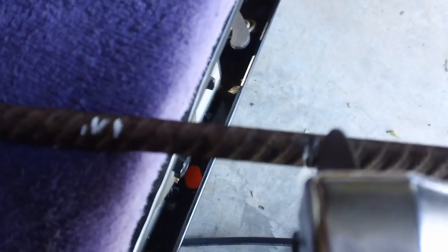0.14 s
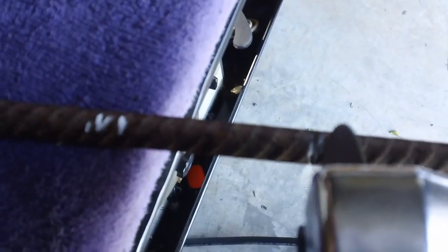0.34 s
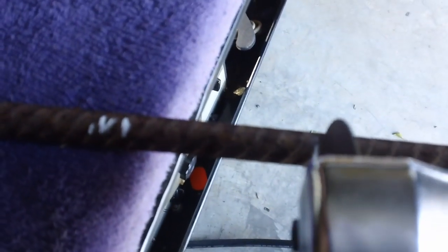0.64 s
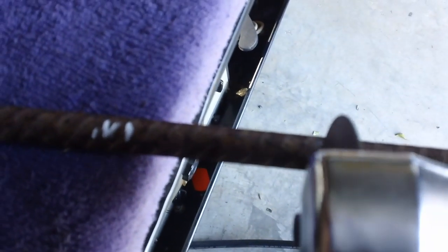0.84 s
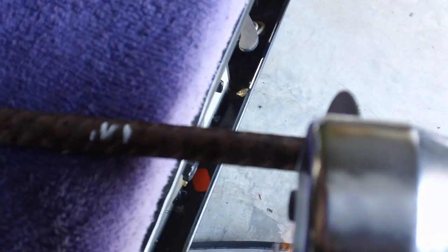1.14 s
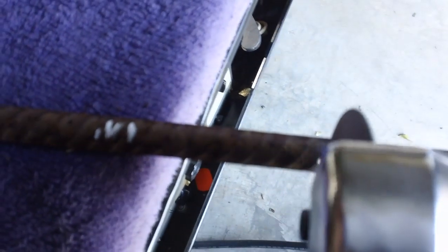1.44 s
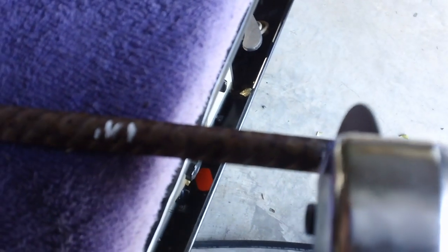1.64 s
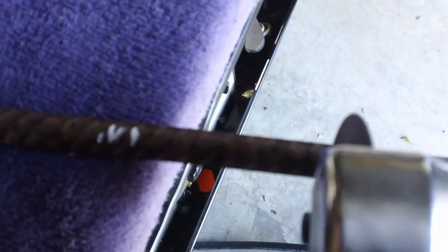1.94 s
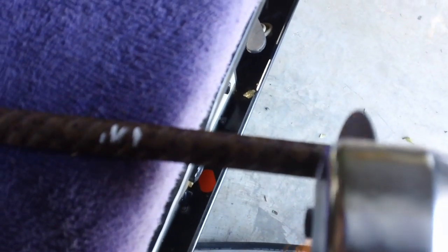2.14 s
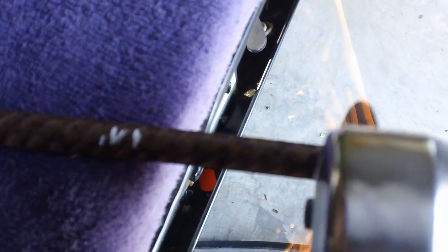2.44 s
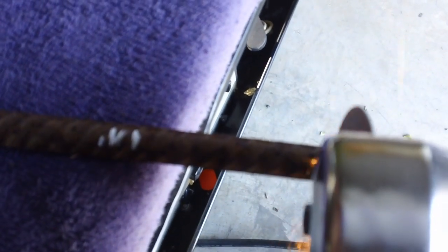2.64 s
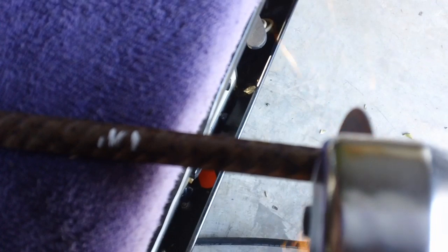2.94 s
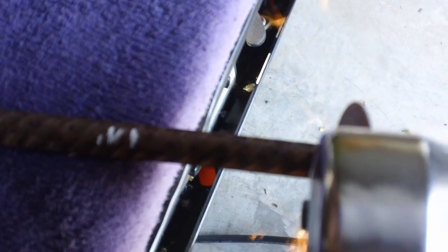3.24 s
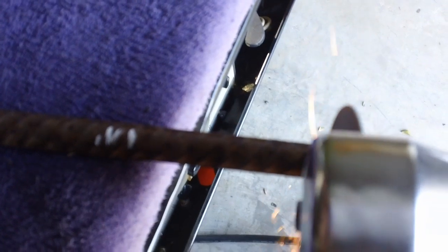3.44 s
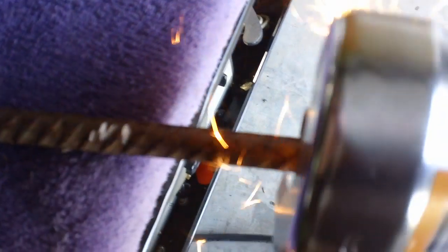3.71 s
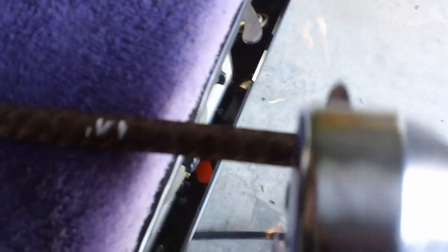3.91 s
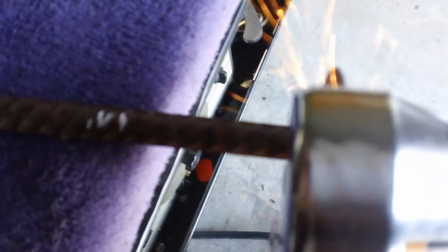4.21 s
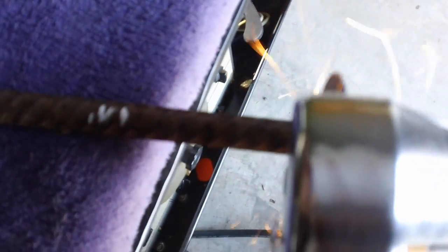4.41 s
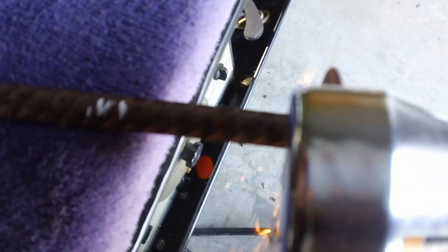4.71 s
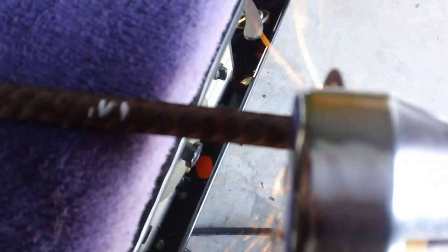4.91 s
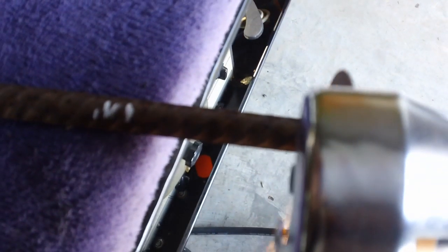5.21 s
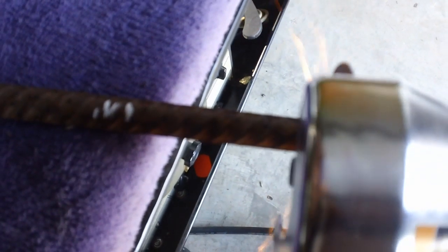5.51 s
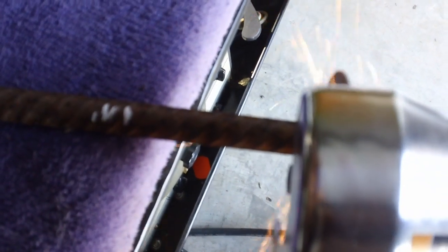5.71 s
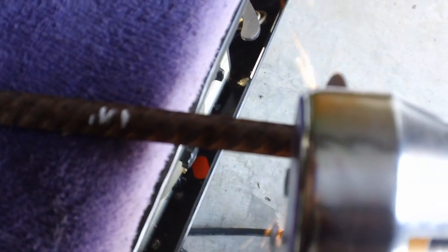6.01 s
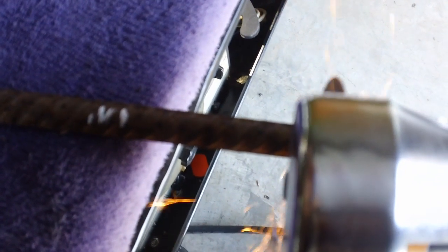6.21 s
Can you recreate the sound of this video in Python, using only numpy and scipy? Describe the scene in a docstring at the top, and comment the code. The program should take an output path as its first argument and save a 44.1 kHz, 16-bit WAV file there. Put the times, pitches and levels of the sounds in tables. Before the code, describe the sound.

An air-powered cut-off tool whines and hisses, then grinds into a steel rod, its pitch sagging under the load.

```python
"""At a workbench, an air-powered cut-off tool runs free, grazes a steel rod, then cuts into it and nearly
stalls once. The motor's four vanes puff air out of the exhaust, which makes a whine and a hiss.
The wheel's gritty rim scrapes the rod, hardest once a turn, and makes both wheel and steel ring.
One close microphone turns itself down when the sound is loud, so the hiss drops during the cut."""
import sys
import numpy as np
from scipy import signal
from scipy.fft import rfft, irfft
from scipy.io import wavfile
from scipy.ndimage import uniform_filter1d, map_coordinates

SR = 44100
rng = np.random.default_rng(int(sys.argv[2]) if len(sys.argv) > 2 else 0)


def generate_wav(signal):
    """Clip the signal to [-1, 1] and save it as 16-bit WAV at the path in sys.argv[1]."""
    frames = np.transpose(np.atleast_2d(signal))
    scaled = np.clip(frames, -1, 1) * 32767
    pcm = np.round(scaled).astype(np.int16)
    wavfile.write(sys.argv[1], SR, pcm)


N = 280228
TIME_S, SPECTRUM_HZ = np.arange(N) / SR, np.fft.rfftfreq(N, 1 / SR)
VANES = 4  # puffs of air per turn of the shaft


def gain_of(db):
    """Turn decibels into a number to multiply by."""
    return 10 ** (np.asarray(db) / 20)


def normalise(x):
    """Scale to an average strength (rms) of 1."""
    return x / np.sqrt(np.mean(x ** 2))


def even_out(x, window_s=.05):
    """Hold the strength near 1 from moment to moment."""
    return x / np.sqrt(uniform_filter1d(x ** 2, int(window_s * SR)) + 1e-12)


def follow(points):
    """Join (time_s, value) points with straight lines."""
    return np.interp(TIME_S, *np.transpose(points))


def drift(rate_hz):
    """A smooth random wander, about 1 in size."""
    hold = max(int(SR / rate_hz), 2)
    steps = np.repeat(rng.standard_normal(N // hold + 1), hold)
    return normalise(uniform_filter1d(uniform_filter1d(steps, hold), hold)[:N])


def tone_gain(hz, tone):
    """Read the gain at these pitches from (pitch_hz, level_db) points."""
    pitch_hz, level_db = np.transpose(tone)
    return gain_of(np.interp(np.log(hz + 1), np.log(pitch_hz), level_db))


def shape_tone(x, tone):
    """Give a sound this balance of low and high, at strength 1."""
    return normalise(irfft(rfft(x) * tone_gain(SPECTRUM_HZ, tone), N))


def peak(hz, pitch_hz, width_hz):
    """Gain of one resonance, a pitch at which a thing likes to ring: 1 at its centre."""
    return 1 / (1 + (2 * (hz - pitch_hz) / width_hz) ** 2)


def resonance_gain(hz, resonances):
    """Joint gain of several resonances at these pitches."""
    return np.sqrt(sum((gain_of(db) * peak(hz, pitch, width)) ** 2 for pitch, width, db in resonances))


def resonate(x, resonances):
    """Let a sound ring through resonances, at strength 1."""
    return normalise(irfft(rfft(x) * resonance_gain(SPECTRUM_HZ, resonances), N))


# Motor speed as the hand leans on the tool, before the dips: time_s, puff_rate_hz
MOTOR_SPEED = [(0.0, 931.7), (0.488, 928), (0.613, 916.5), (0.98, 918.7), (2.258, 911.1), (2.608, 825.5),
               (3.373, 757), (3.603, 749.9), (3.749, 712), (3.98, 787.5), (4.312, 766), (4.891, 723.3),
               (4.955, 739), (5.076, 732), (5.314, 760.9), (5.493, 744), (5.719, 696.6), (6.177, 683.4),
               (6.35, 661.6)]
# The wheel catches and drags the motor down: slowest_at_s, drop_hz, fall_s, recovery_s
SPEED_DIPS = [(1.231, 39.5, 0.17, 0.24), (3.824, 156, 0.08, 0.181), (4.173, 24, 0.055, 0.1),
              (4.545, 13.8, 0.052, 0.063)]

def motor_speed(dip_shape=1.7):
    """Puffs per second: the motor slows under load, drops fast at a catch and recovers more slowly."""
    puff_hz = follow(MOTOR_SPEED)
    for slowest_at_s, drop_hz, fall_s, recovery_s in SPEED_DIPS:
        slope_s = np.where(TIME_S < slowest_at_s, fall_s, recovery_s)
        away = np.minimum(np.abs(TIME_S - slowest_at_s) / slope_s, 1)
        puff_hz -= drop_hz * (1 - away ** dip_shape)  # shape 1 is pointed, 2 is round
    return puff_hz


def wheel_hum(turns, shaft_hz, octave_db=-9, waver_db=2.5):
    """The unbalanced wheel hums, loudest when it spins near the resonance of the tool's body."""
    hum = np.sin(2 * np.pi * turns) + gain_of(octave_db) * np.sin(2 * np.pi * 2 * turns)
    gain = gain_of(-53) + gain_of(-42.5) * peak(shaft_hz, pitch_hz=178.5, width_hz=27)
    return np.sqrt(2) * gain * gain_of(waver_db * drift(11)) * hum


# Whistles of the motor and wheel: start_s, end_s, cycles_per_turn, level_db
WHISTLE_NOTES = [(-.05, .65, 24, -34.5), (1.03, 1.3, 1, -44.5), (2.3, 2.9, 2, -47), (2.44, 2.68, 20, -28.5),
                 (3.28, 3.68, 32, -25.5), (3.3, 3.66, 30, -30), (3.34, 3.65, 47, -24),
                 (4.2, 4.8, 21, -31.5), (4.6, 5.2, 28, -31.5), (5.04, 5.55, 32, -31),
                 (5.08, 5.55, 21, -29.5), (5.56, 6.3, 28, -27.5), (5.6, 6.35, 9, -33.5),
                 (5.72, 6.2, 51, -26), (5.76, 6.14, 19, -28), (5.8, 6.35, 23, -30)]

def whistles(turns, fade_s=0.06, flutter_db=2.5):
    """Single tones sing out for a moment, and their pitch follows the shaft's speed."""
    out = 0
    for start_s, end_s, cycles_per_turn, level_db in WHISTLE_NOTES:
        fade = np.clip(np.minimum(TIME_S - start_s, end_s - TIME_S) / fade_s, 0, 1)
        gain = fade * gain_of(level_db + flutter_db * drift(25))
        out += gain * np.sin(2 * np.pi * cycles_per_turn * turns + drift(6))
    return np.sqrt(2) * out


# Tone of the vanes' buzz: pitch_hz, relative_level_db
BUZZ_TONE = [(170, -18), (370, -7), (460, -14.5), (650, -15), (1200, -8.5), (1600, 2.5), (2100, -11),
             (2600, -1), (3250, 6), (4200, 1.5), (5400, 2), (6500, 1), (8500, -8), (11000, -2)]

def vane_buzz(turns, shaft_hz, sway_db=3.6, flutter_db=3.0):
    """No two vanes seal alike, so weak tones sound at multiples of the shaft's speed."""
    out, hold = 0, 64  # each gain is held for 64 samples
    for multiple in range(2, 48):
        if multiple % VANES or multiple > 4 * VANES:  # skip the whine's four tones
            waver_db = sway_db * drift(1.98)[::hold] + flutter_db * drift(25.06)[::hold]
            gain = tone_gain(multiple * shaft_hz[::hold], BUZZ_TONE) * gain_of(waver_db)
            out += np.repeat(gain, hold)[:N] * np.sin(2 * np.pi * (multiple * turns + rng.random()))
    return normalise(out)


# Tone of the rushing air: pitch_hz, relative_level_db
HISS_TONE = [(30, -62), (100, -26), (200, -16.5), (700, -11.5), (1100, -8), (1600, -1.5), (2050, -7),
             (2800, 3), (3900, -0.5), (5100, 4.5), (6500, 0.5), (7500, 6), (9600, 4), (11500, -5.5),
             (13500, -5.5), (14900, 0)]

def air_hiss(turns, puff_depth=0.11, flicker_db=-0.02):
    """Swirling exhaust air hisses, pulsing a little with every vane."""
    puffs = 1 + puff_depth * np.cos(2 * np.pi * VANES * turns)
    return shape_tone(rng.standard_normal(N) * puffs, HISS_TONE) * gain_of(flicker_db * drift(15))


# Resonances of the exhaust that the whine slides through: pitch_hz, width_hz, level_db
EXHAUST_RESONANCES = [(667, 173, -22), (754.7, 74, -24.5), (812, 56.5, -23.5), (931.2, 8.3, -31),
                      (1206, 84, -25.5), (1353, 105, -28), (1502, 77, -25.5), (1707, 410, -28),
                      (2216, 220, -28.5), (2798, 370, -21), (3050, 460, -21.5), (3298, 36, -19),
                      (3610, 500, -27)]

def exhaust_whine(turns, puff_hz, load, flutter_db=0.75, sway_db=2.0, choke_db=-1.3):
    """The vanes' puffs blend into four clean tones that weaken and sway under load."""
    out = 0
    for harmonic in range(1, 5):
        waver_db = flutter_db * drift(35) + load * (choke_db + sway_db * drift(11))
        gain = resonance_gain(harmonic * puff_hz, EXHAUST_RESONANCES) * gain_of(waver_db)
        out += gain * np.sin(2 * np.pi * (harmonic * VANES * turns + rng.random()))
    return np.sqrt(2) * out


def grit_force(turns, load, high_spot=0.27, patchy_db=4.5, rim_points=256, fresh_free=0.02, fresh_stall=.7):
    """The grit pushes on the steel: the same grains come back every turn and slowly wear away."""
    grid = (int(turns[-1]) + 2, rim_points // 2 + 1)  # a row per turn, a column per ripple round the rim
    wear = .12 * np.cumsum(rng.standard_normal(grid), axis=0)
    patches = normalise(uniform_filter1d(rng.standard_normal(grid), size=40, axis=0, mode="wrap"))
    phase = wear + 2 * np.pi * rng.random(grid[1])
    bumps = irfft(gain_of(patchy_db * patches) * np.exp(1j * phase), rim_points)
    repeating = normalise(map_coordinates(bumps.ravel(), [turns * rim_points], order=3))
    # near a stall the rim bites unevenly, so a larger share is fresh on each turn
    fresh = fresh_free + (fresh_stall - fresh_free) * load ** 3
    force = np.sqrt(1 - fresh) * repeating + np.sqrt(fresh) * rng.standard_normal(N)
    # the wheel is not quite round and presses hardest once a turn
    return normalise(force * np.exp(high_spot * np.cos(2 * np.pi * turns)))


# Short bursts of ringing: peak_s, half_length_s, pitch_hz, width_hz, level_db
CHATTER_BURSTS = [(1.16, 0.16, 9060, 550, -24), (2.262, 0.029, 8100, 700, -19),
                  (3.808, 0.056, 3870, 380, -20.5), (3.813, 0.074, 5650, 500, -21.5),
                  (3.733, 0.031, 8180, 700, -15), (3.836, 0.094, 7800, 400, -23),
                  (3.818, 0.063, 9760, 398.7, -20), (3.885, 0.037, 3120, 380, -22),
                  (4.13, 0.036, 5895, 463.6, -16.5), (5.644, 0.046, 7120, 149.4, -24)]

def wheel_chatter(force):
    """When the wheel jams in its slot, single resonances swell and fade."""
    out = 0
    for peak_s, half_length_s, pitch_hz, width_hz, level_db in CHATTER_BURSTS:
        swell = np.exp(-((TIME_S - peak_s) / half_length_s) ** 2)
        ringing = resonate(force, [(pitch_hz, width_hz, 0)])
        strength = np.sqrt(np.average(ringing ** 2, weights=swell ** 2))
        out += gain_of(level_db) * swell * ringing / strength
    return out


# The wheel on the rod, one graze and two cuts: start_s, end_s, relative_level_db
TOUCHES = [(1.022, 1.27, -10), (2.232, 3.99, -1.5), (4.004, 6.45, -1.5)]

def wheel_touch(bite_s=0.022, lift_s=0.059):
    """How firmly the wheel meets the rod: a quick bite, a hold and a slower lift."""
    return sum(gain_of(db) * np.clip(np.minimum((TIME_S - start) / bite_s, (end - TIME_S) / lift_s), 0, 1)
               for start, end, db in TOUCHES)


# How hard the wheel is pushed into the steel: time_s, relative_level_db
HAND_PUSH = [(2.25, -17), (2.31, -18.5), (2.52, -12.5), (2.88, -10), (3.25, -15.5), (3.48, -14.5),
             (3.6, -15.5), (3.72, -10.5), (3.9, -9.5), (4.1, -15), (4.3, -13.5), (4.68, -16), (4.82, -15),
             (4.95, -18.5), (5.1, -14), (5.3, -19), (5.8, -14.5), (6.0, -18.5), (6.3, -13)]
# Tone of the tearing steel: pitch_hz, relative_level_db
RASP_TONE = [(30, -44), (100, -17.5), (200, -7.5), (400, -1.5), (1000, -1), (2000, -4.5), (3000, 3),
             (6000, -16.5), (12000, 0.5), (15000, -9.5)]
# Resonances of the wheel and rod: pitch_hz, width_hz, relative_level_db
STEEL_RESONANCES = [(3325, 170, -11.5), (3962, 530, -5.5), (4790, 160, -13), (5540, 190, -13.5),
                    (6200, 530, -7), (7204, 240, -2.5), (7420, 90, 1.5), (8030, 270, 1.5), (8310, 660, -1),
                    (8850, 290, 3.5), (10397, 500, -6), (11140, 970, -7), (14000, 670, -14.5)]

def steel_scrape(force, ring_db=1.6, rasp_db=-10.0, judder_db=1.1):
    """The grit rings wheel and rod over a rasp of tearing steel; a harder push is louder."""
    push_db = follow(HAND_PUSH) + judder_db * drift(26)  # the hand-held wheel shakes in its slot
    rasp = gain_of(rasp_db) * shape_tone(rng.standard_normal(N), RASP_TONE)
    ringing = gain_of(ring_db) * even_out(resonate(force, STEEL_RESONANCES))
    return wheel_touch() * gain_of(push_db) * (ringing + rasp)


def scene(air_db=-15.5, buzz_vs_hiss_db=-9.0, free_hz=930, stall_hz=560):
    """One shaft drives everything, and its speed trembles slightly."""
    puff_hz = motor_speed() * (1 + .0008 * drift(45))
    load = np.clip((free_hz - puff_hz) / (free_hz - stall_hz), 0, 1)  # 0 running free, 1 nearly stalled
    shaft_hz = puff_hz / VANES
    turns = np.cumsum(shaft_hz) / SR
    air = gain_of(air_db) * (air_hiss(turns) + gain_of(buzz_vs_hiss_db) * vane_buzz(turns, shaft_hz))
    tool = exhaust_whine(turns, puff_hz, load) + air + wheel_hum(turns, shaft_hz) + whistles(turns)
    force = grit_force(turns, load)
    mono = tool + steel_scrape(force) + wheel_chatter(force)
    return np.array([mono, mono])


def gain_control(x, threshold_db=-14.0, ratio=3.7, response_s=0.048):
    """Turn the sound down while its level is over the threshold."""
    memory = np.exp(-1 / (response_s * SR))
    level = np.sqrt(signal.lfilter([1 - memory], [1, -memory], np.mean(x ** 2, axis=0)))
    return x * np.maximum(level / gain_of(threshold_db), 1) ** (1 / ratio - 1)


def record(dry, ceiling=.85, low_cut_hz=70, notch_hz=12480, notch_width_hz=2400, top_hz=15330):
    """The microphone tames loud parts and drops the deep bass, one band of treble and the very top."""
    held = gain_control(dry)
    rounded = held / (1 + (held / ceiling) ** 8) ** (1 / 8)  # rounds off the tallest peaks
    thinned = signal.sosfilt(signal.butter(2, low_cut_hz, "high", fs=SR, output="sos"), rounded)
    notched = signal.lfilter(*signal.iirnotch(notch_hz, notch_hz / notch_width_hz, fs=SR), thinned)
    return irfft(rfft(notched) * (SPECTRUM_HZ < top_hz), N)


dry = scene()
out = record(dry)
generate_wav(out)
```